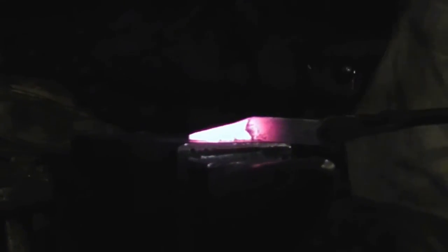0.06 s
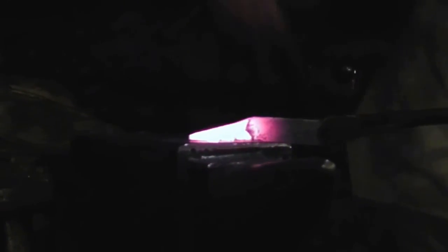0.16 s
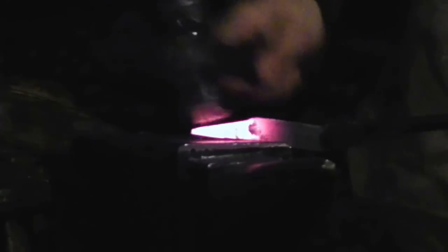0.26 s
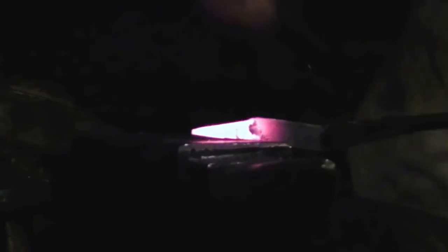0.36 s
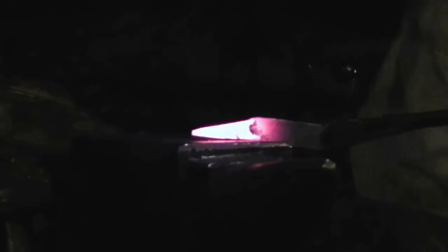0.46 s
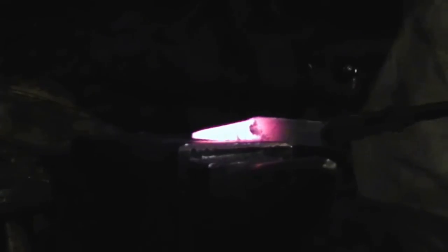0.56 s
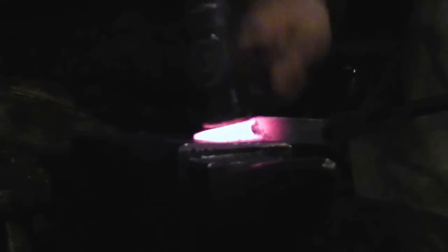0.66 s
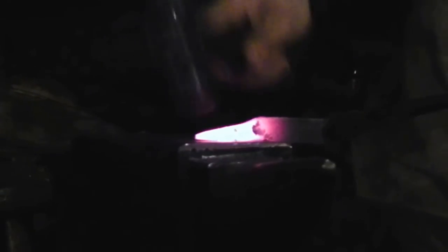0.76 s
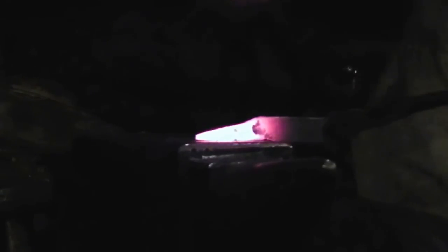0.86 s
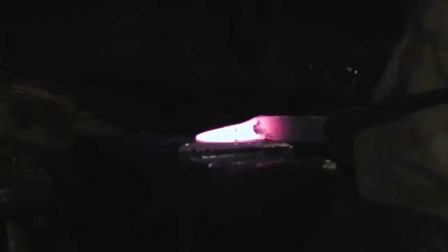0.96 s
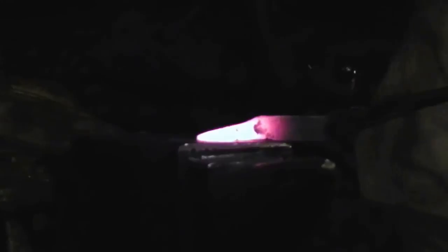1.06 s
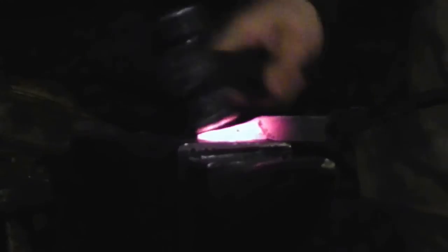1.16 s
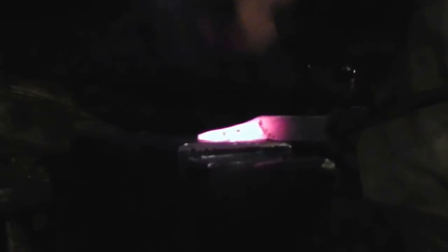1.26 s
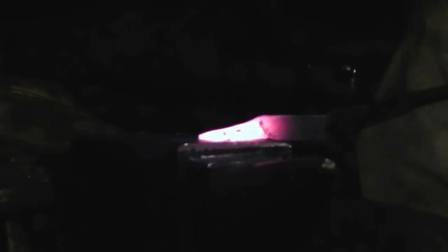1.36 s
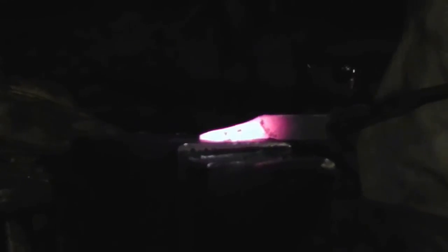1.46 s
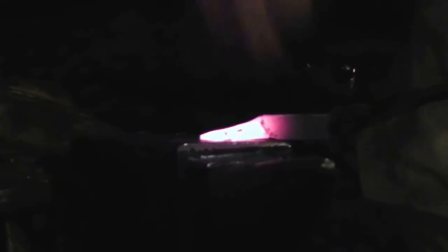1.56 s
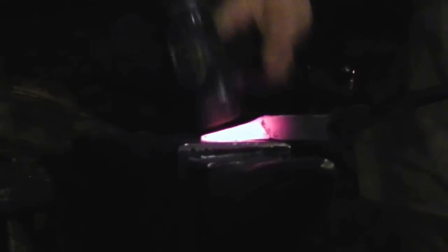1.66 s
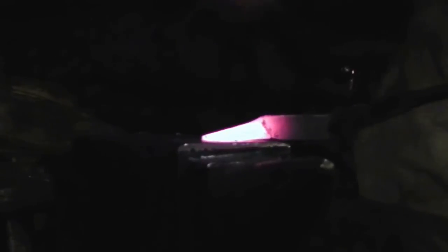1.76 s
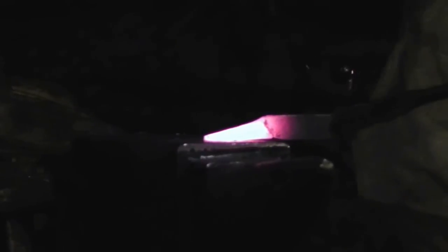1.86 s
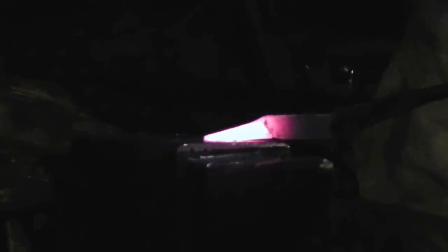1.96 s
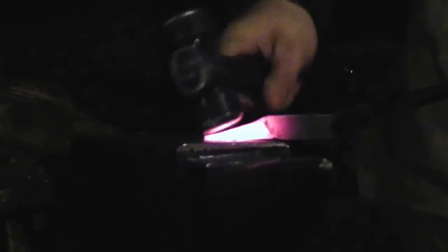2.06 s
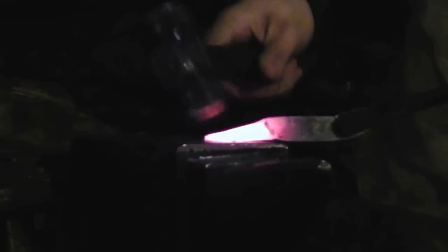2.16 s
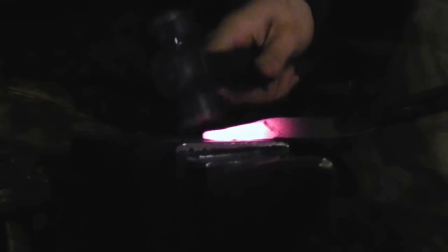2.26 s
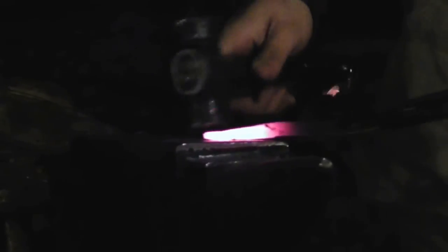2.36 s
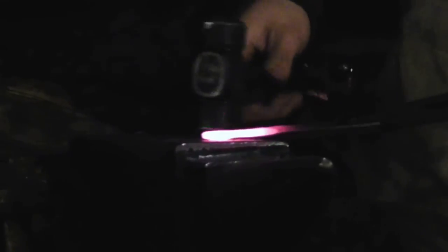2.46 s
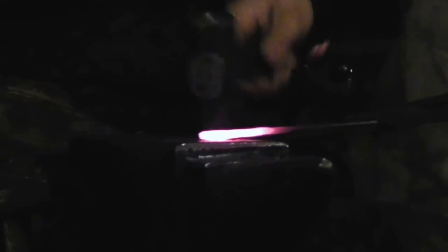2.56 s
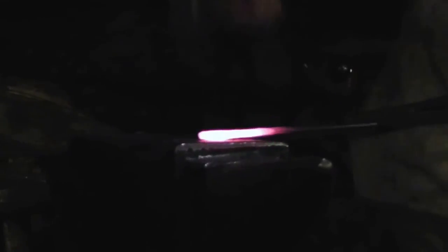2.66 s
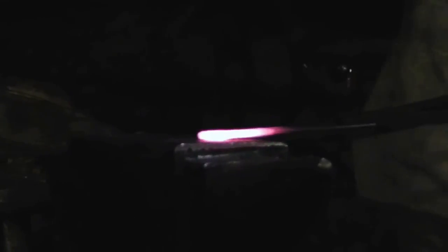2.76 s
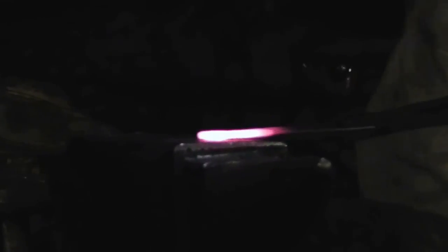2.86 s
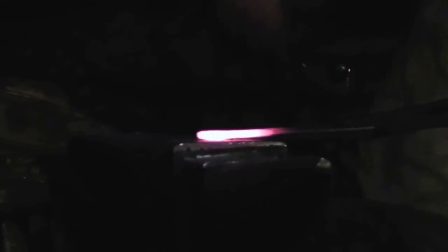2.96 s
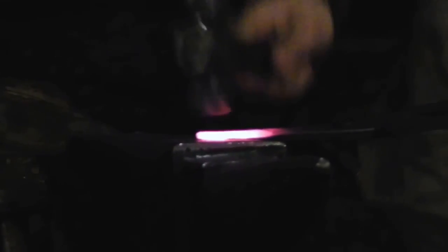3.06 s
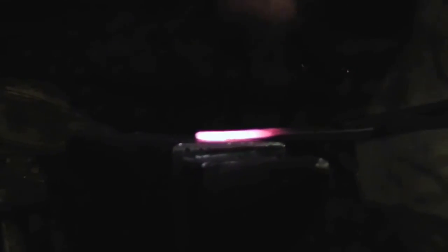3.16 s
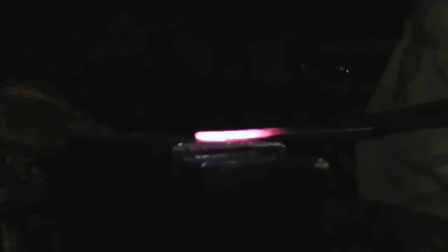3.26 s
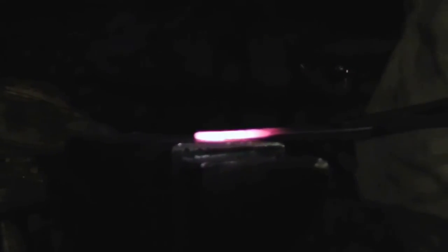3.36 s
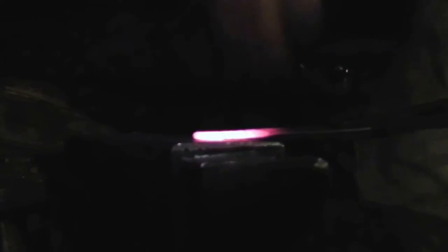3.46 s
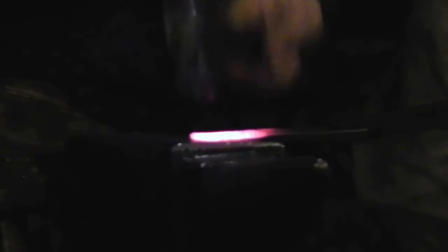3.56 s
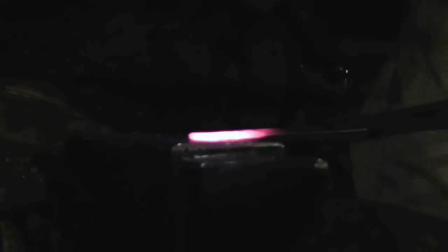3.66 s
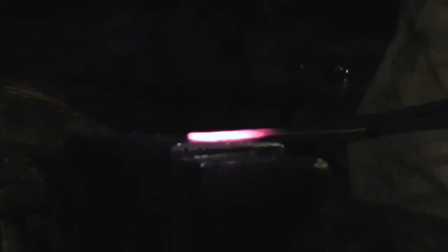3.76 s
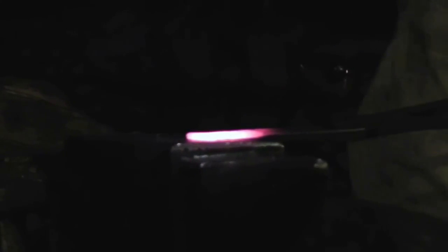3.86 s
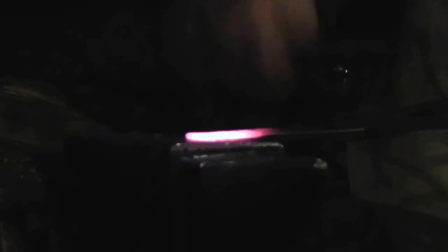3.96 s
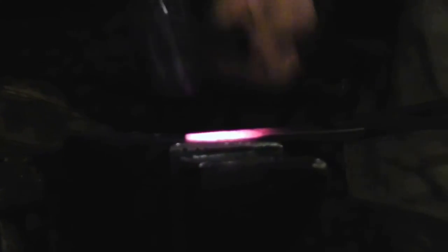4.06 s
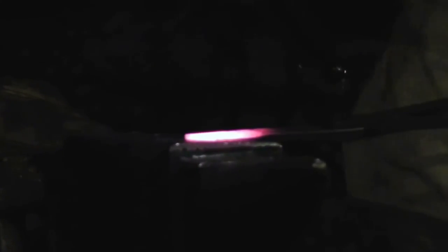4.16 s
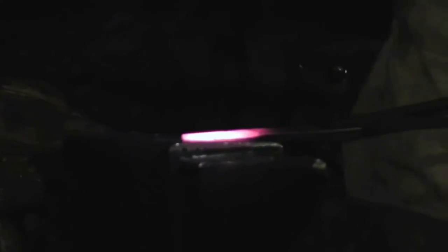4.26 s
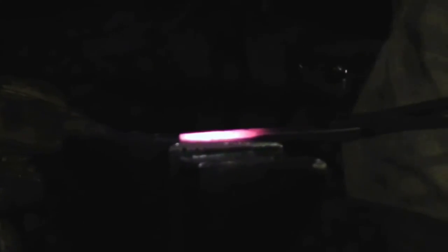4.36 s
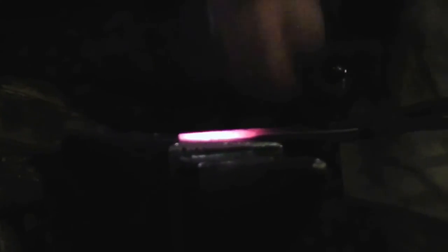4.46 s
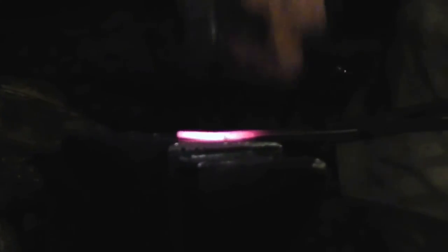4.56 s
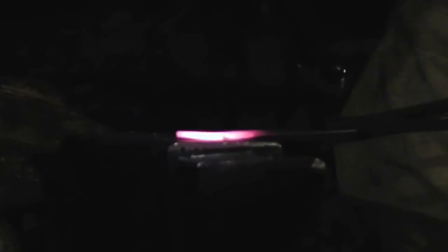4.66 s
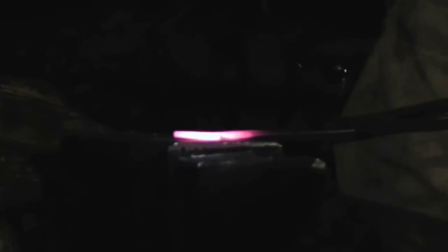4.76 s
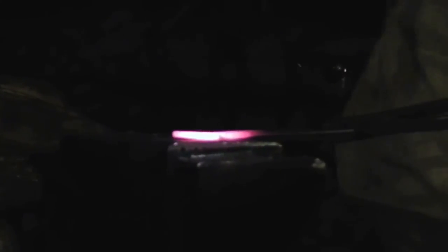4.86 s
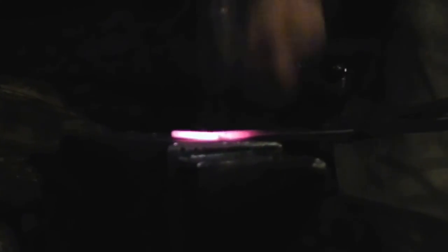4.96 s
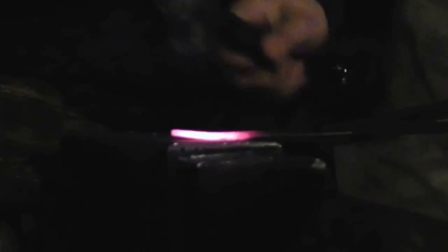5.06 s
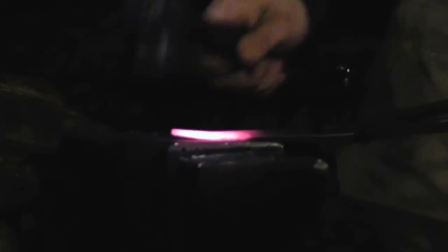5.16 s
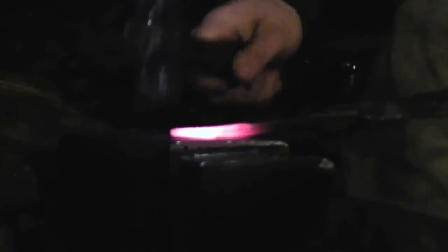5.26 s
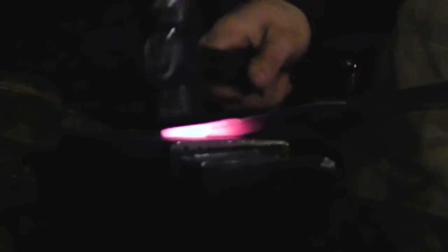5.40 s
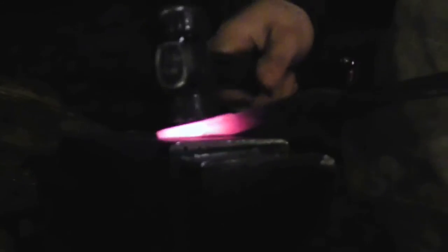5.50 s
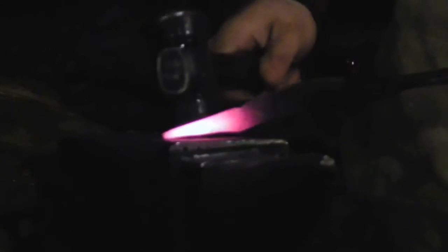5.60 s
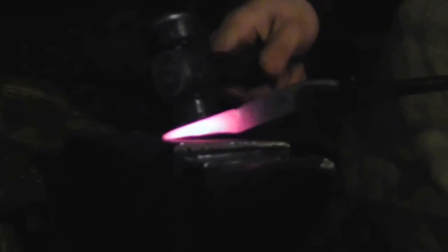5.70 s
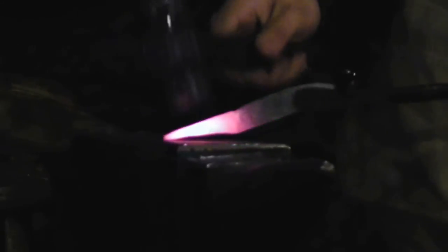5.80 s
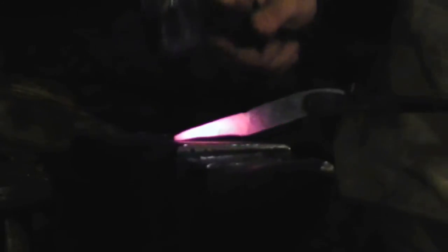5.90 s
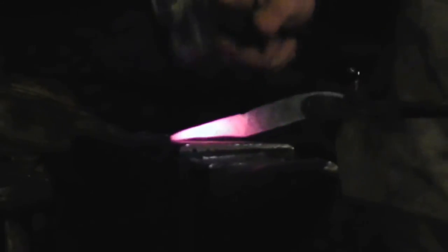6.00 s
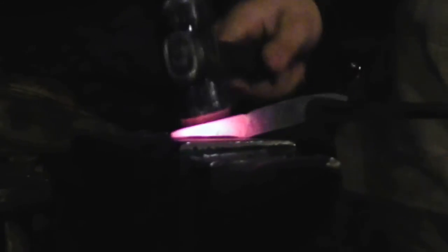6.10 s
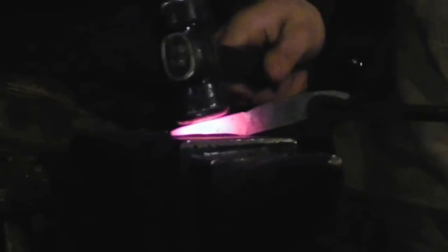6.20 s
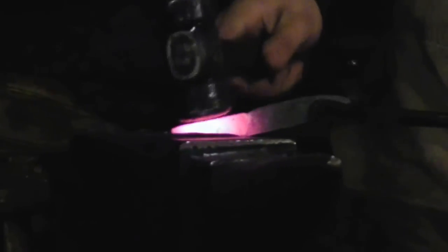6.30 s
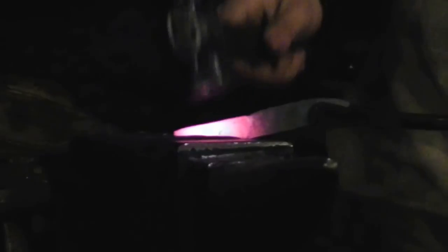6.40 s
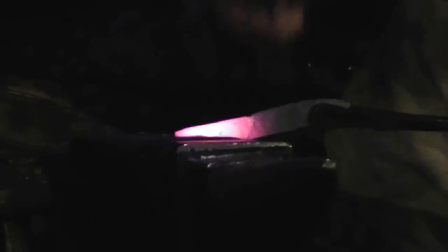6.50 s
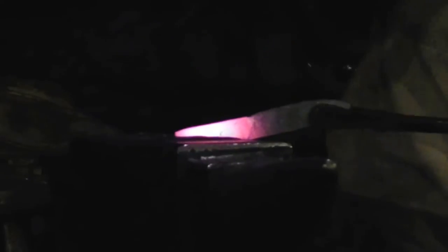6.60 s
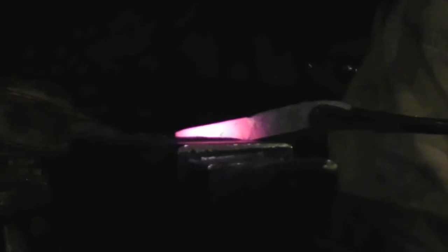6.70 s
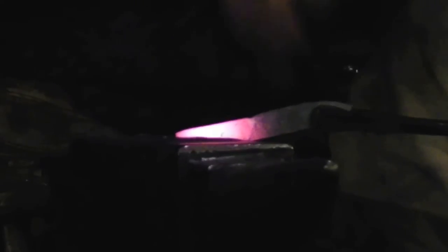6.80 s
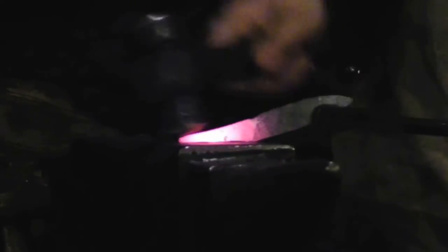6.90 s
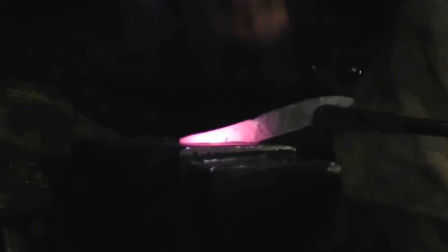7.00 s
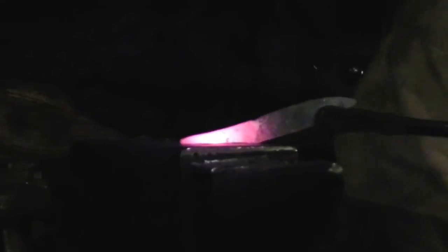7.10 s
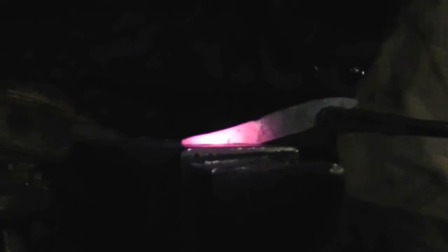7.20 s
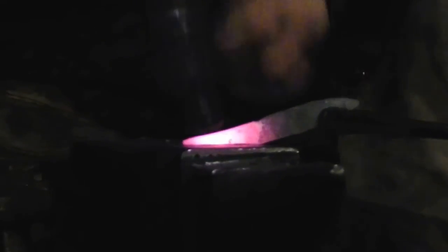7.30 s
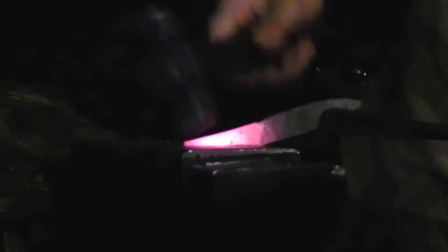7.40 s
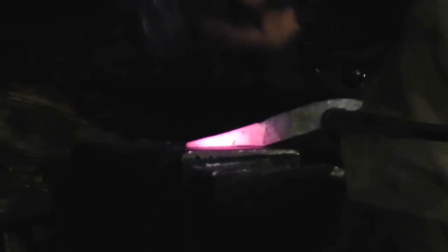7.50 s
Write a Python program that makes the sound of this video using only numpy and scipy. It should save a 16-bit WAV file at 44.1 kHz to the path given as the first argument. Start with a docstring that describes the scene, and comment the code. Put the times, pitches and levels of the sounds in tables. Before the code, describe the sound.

Ten regular hammer blows on a hot bar, growing brighter and harder, with a quick run of light bounces on bare anvil midway and a longer dying patter after the last. Then a pause, soft slaps, a crackier slap, a stronger clank and dull bar knocks. Small, hard-walled forge with short reverberation, a low even rush of air, a close, narrow, dull-topped microphone that clips and squashes the loud hits.

```python
"""A smith works a glowing bar on an anvil in a small forge, at about two hammer blows a second.
Up to 5 s: hard clanks with a short, beating ring; at 2.2 and 5.2 s the hammer bounces on the bare anvil.
From 6 s: slapping blows on a tilted bar, one flatter blow, then dull knocks as the bar shifts.
Each hit is filtered noise plus decaying modes; a faint, even rush of air runs throughout.
Gain control flattens about a tenth of a second of the room's answer; the close microphone overloads."""
import sys
import numpy as np
from scipy import signal
from scipy.io import wavfile

SR = 44100
rng = np.random.default_rng(int(sys.argv[2]) if len(sys.argv) > 2 else 0)


def transcribe(signal):
    """Save signal, clipped to [-1, 1], as a 16-bit WAV file at the path in sys.argv[1]."""
    frames = np.atleast_2d(signal).T
    limited = np.clip(frames, -1, 1)
    pcm = np.round(limited * 32767).astype(np.int16)
    wavfile.write(sys.argv[1], SR, pcm)


N = 332682

# hammer on hot bar: (time [s], force [dB], contact hardness [dB], gap under the bar [0-1])
BLOWS = [ (0.1324, -0.3, -4, .25), (0.5953, -0.5, -0.5, .08), (1.0588, -1.2, -1.5, .06),
         (1.5193, -1.7, 1.5, .0), (1.965, -3, 6, .0), (2.937, -2.3, 0.5, .22), (3.4215, -1, 5, .0),
         (3.9097, -2, -0.5, .0), (4.4121, -4.3, 8, 0.03), (4.904, -4.2, 10, 0), (6.006, -16.7, -7, .85),
         (6.0669, -30, -4, .85), (6.7596, -8.7, -5, .85), (7.2316, -3.7, -4.5, .12)]
# hammer on bare anvil: (time [s], force [dB], contact hardness [dB], face ring [dB])
BOUNCES = [(2.1902, -12.3, 2, -4), (2.285, -16, 5.5, 9.5), (2.3393, -16.8, 1, 7.5),
           (5.153, -12.5, 9.5, 13.5), (5.2960, -15.3, 7, 8), (5.3961, -17, 3, 4.5), (5.4615, -21.5, 2, 5.5),
           (5.5000, -31.5, 1.5, 5)]
# bar shifting on the anvil: (time [s], force [dB])
KNOCKS = [(6.6050, -50), (7.4360, -26.5), (7.4700, -39), (7.4970, -34), (7.5230, -24.5)]

# mode levels are relative; each hit offsets them
# anvil's main note, close modes that beat: (frequency [Hz], level [dB], t60 [s])
ANVIL_NOTE_MODES = [(1790.1, -25.5, .37), (1794.6, -28, .37), (1799, -2.8, .37), (1803.4, -28, .37),
                    (1807.9, -25.5, .37)]
# other modes of the anvil's body: (frequency [Hz], level [dB], t60 [s])
ANVIL_BODY_MODES = [(1033.6, -19.5, 0.35), (1475, -20, 0.1), (1522, -20.5, 0.15), (1942, -18, 0.35),
                    (1979, -15.5, 0.21), (2324, -19, 0.37), (4859, -29, .29), (6640, -19.5, 0.14)]
# stiffer modes of the anvil's face: (frequency [Hz], level [dB], t60 [s])
ANVIL_FACE_MODES = [(3601, -17, .33), (3855, -22, .17), (3876, -18, .17)]
# hammer head: (frequency [Hz], level [dB], t60 [s])
HAMMER_MODES = [(2299, -18.5, .22), (2520, -23, .17), (2573, -25, .18), (3295, -21, .15),
                (3472, -17.5, .27), (4210, -25, .12), (5330, -24, .16), (5405, -25, .2), (6230, -22, .15),
                (7110, -21, .1)]
# dull knock of the anvil on its stand: (frequency [Hz], level [dB], t60 [s])
STAND_MODES = [(241, -30, 0.54), (304.7, -24.5, 0.27), (346.4, -28.5, 0.51), (401, -29.5, 0.35),
               (502.6, -32, 0.28), (587, -26, 0.47), (696, -25, 0.3), (780, -26, 0.099), (877, -25, 0.29)]

# spectra are relative; in_bands() normalises their power
# first burst, straight from the contact: (frequency [Hz], density [dB per Hz])
BURST_SPECTRUM = [(35, -25.5), (150, -11), (400, 0.5), (800, 0.5), (1500, -1.5), (3000, -6), (3700, 6.5),
                  (4800, -1.5), (7000, 1)]
# broad impact as the room returns it: (frequency [Hz], density [dB per Hz])
CLANK_SPECTRUM = [(35, -29), (75, -25), (115, -14.5), (175, -2.5), (260, 6), (450, 3.5), (750, 3.5),
                  (1400, 1), (2400, -2.5), (2900, -3), (3600, -1), (4600, -5.5), (7000, -10)]
# decay of the forge: (frequency [Hz], t60 [s])
FORGE_T60 = [(50, 0.38), (150, 0.71), (300, 0.37), (700, 0.36), (2000, 0.37), (4000, 0.29), (7500, 0.28)]
# rush of air: (frequency [Hz], density [dB per Hz])
AIR_SPECTRUM = [(30, -27.5), (60, -4), (130, -1), (260, 1.5), (450, -2.5), (900, -3.5), (1900, -7.5),
                (3000, -12), (5000, -14.5), (7500, -16.5)]
# level of the rush: (time [s], level [dB])
AIR_LEVEL = [(0, -57.1), (5.9, -57.1), (6.45, -59.9), (7.54, -57.2)]
# centres of the thud, force, clang and crack ranges: (frequency [Hz])
RANGES_HZ = [260, 900, 3200, 6800]

BAND_EDGES_HZ = np.geomspace(25, 9500, 25)
BAND_HZ = np.sqrt(BAND_EDGES_HZ[1:] * BAND_EDGES_HZ[:-1])
BANK = [signal.butter(2, BAND_EDGES_HZ[k:k + 2], "band", fs=SR, output="sos") for k in range(len(BAND_HZ))]
AGE_S = np.arange(SR) / SR  # time since a hit

# flat bar: the soft steel damps the hammer
BAR_THUD_DB, BAR_CRACK_DB, BAR_BODY_DB, BAR_FACE_DB, BAR_HEAD_DB = -0.6, -0.7, -0.5, -10, -16
# tilted bar: change at full gap
GAP_THUD_DB, GAP_CRACK_DB, GAP_BODY_DB = 6, 12, -16
# steel on steel: the hammer rings freely
BOUNCE_THUD_DB, BOUNCE_CRACK_DB, BOUNCE_BODY_DB, BOUNCE_HEAD_DB = 3, -13.5, -4.5, 2
# dB per dB of hardness
CRACK_PER_HARDNESS, BOUNCE_CRACK_PER_HARDNESS = .55, 2.3
FACE_PER_HARDNESS, HEAD_PER_HARDNESS = 1.2, .6

WALL_ECHO_S, WALL_ECHO_DB = .03807, -9.4
FAR_ECHO_S, FAR_ECHO_DB = .16982, -25
BOOM_HZ, BOOM_AT_S, BOOM_WIDTH_S, BOOM_DB = (200, 320), .09, .018, -11
MIC_TOP_HZ, TREBLE_SPLIT_HZ, CUTOFF_HZ = 7328, 8200, 16500


def hammering():
    """Blows, bounces and knocks, each at its time and force, all in the same room."""
    out = np.zeros(N + 2 * SR)
    bands = clank_bands()
    for rows, sound in ((BLOWS, blow), (BOUNCES, bounce), (KNOCKS, knock)):
        for time_s, force_db, *manner in rows:
            start = round(time_s * SR)
            out[start:start + SR] += from_db(force_db) * sound(bands, *manner)
    return out[:N]


def blow(bands, hardness_db, gap):
    """Hammer on hot bar: hardness brightens it; a gap trades the anvil's ring for slap and crack."""
    return strike(bands,
                  thud_db=BAR_THUD_DB + GAP_THUD_DB * gap,
                  clang_db=hardness_db,
                  crack_db=BAR_CRACK_DB + CRACK_PER_HARDNESS * hardness_db + GAP_CRACK_DB * gap,
                  body_db=BAR_BODY_DB + GAP_BODY_DB * gap,
                  face_db=BAR_FACE_DB + FACE_PER_HARDNESS * hardness_db,
                  head_db=BAR_HEAD_DB + HEAD_PER_HARDNESS * hardness_db)


def bounce(bands, hardness_db, face_db):
    """Hammer on bare anvil: a light tap that rings the face more or less with the spot."""
    return strike(bands,
                  thud_db=BOUNCE_THUD_DB,
                  clang_db=hardness_db,
                  crack_db=BOUNCE_CRACK_DB + BOUNCE_CRACK_PER_HARDNESS * hardness_db,
                  body_db=BOUNCE_BODY_DB,
                  face_db=face_db,
                  head_db=BOUNCE_HEAD_DB + HEAD_PER_HARDNESS * hardness_db,
                  stand_db=-1.0)


def knock(bands):
    """The soft bar touches the anvil with hardly any ring."""
    return strike(bands, thud_db=2.5, clang_db=-10.5, crack_db=-25, body_db=-17, face_db=-9, head_db=-18)


def strike(bands, thud_db, clang_db, crack_db, body_db, face_db, head_db, stand_db=0.0):
    """Any contact: a clank in its own colour, with anvil, stand and hammer set ringing."""
    range_db = [thud_db, 0, clang_db, crack_db]
    colour = from_db(np.interp(np.log(BAND_HZ), np.log(RANGES_HZ), range_db))
    clank = signal.fftconvolve(colour @ bands, contact())[:SR]
    clank += from_db(thud_db) * boom()
    note = from_db(body_db) * ring(ANVIL_NOTE_MODES)
    steel = note + from_db(body_db) * ring(ANVIL_BODY_MODES)
    steel += from_db(face_db) * ring(ANVIL_FACE_MODES)
    steel += from_db(head_db) * ring(HAMMER_MODES)
    steel += from_db(thud_db + stand_db) * ring(STAND_MODES)
    return clank + with_wall_echo(steel) + far_echo(with_wall_echo(note))


def contact(crunch_db=-7.0, crunch_t60_s=0.003, crunch_hz=2200):
    """One push, then a few milliseconds of scale crushing and the bar slapping the anvil."""
    crunch = (rng.standard_normal(SR) * dying(crunch_t60_s))[:SR // 50]
    crunch /= np.linalg.norm(crunch)
    pulse = from_db(crunch_db) * butter(crunch, crunch_hz, "high")
    pulse[0] += 1
    return pulse


def ring(modes, scatter_db=0.45):
    """Decaying sine modes, each randomly stronger or weaker with the spot that is hit."""
    total = np.zeros(SR)
    for hz, level_db, t60_s in modes:
        gain = from_db(level_db + scatter_db * rng.standard_normal())
        total += gain * np.sin(2 * np.pi * hz * AGE_S) * dying(t60_s)
    return total


def clank_bands(burst_db=1.0, slap_db=-5.0, slap_s=.0055,
                early_db=-5.0, early_t60_s=0.061, room_db=-7.5, build_s=0.006):
    """Path from anvil to microphone, shared by all hits: hard burst, near reflection, room."""
    push = np.exp(-(AGE_S / .003) ** 4)
    burst = from_db(burst_db) * (push + from_db(slap_db) * delayed(push, slap_s))
    tails = np.array([dying(t60_s) for t60_s in at_hz(FORGE_T60, BAND_HZ)])
    early = from_db(early_db) * dying(early_t60_s)
    late = from_db(room_db) * tails * (1 - np.exp(-AGE_S / build_s))
    direct = in_bands(rng.standard_normal((2, SR)) * burst, BURST_SPECTRUM)
    return direct + in_bands(rng.standard_normal((2, SR)), CLANK_SPECTRUM) * (early + late)


def boom():
    """Low notes of the room gather into a brief swell about a tenth of a second after the hit."""
    swell = np.exp(-.5 * ((AGE_S - BOOM_AT_S) / BOOM_WIDTH_S) ** 2)
    return from_db(BOOM_DB) * swell * butter(rng.standard_normal(SR), BOOM_HZ, "band")


def with_wall_echo(ringing):
    """The near wall returns the ring out of step with the main note and chokes it."""
    return ringing + from_db(WALL_ECHO_DB) * delayed(ringing, WALL_ECHO_S)


def far_echo(ringing):
    """The far end of the forge returns the main note late and soft-edged: it dips and swells again."""
    soft_edged = ringing * (1 - dying(.06))
    return from_db(FAR_ECHO_DB) * delayed(soft_edged, FAR_ECHO_S)


def air():
    """Faint, even rush of air behind the work: noise shaped in bands."""
    # the first second is dropped: filters settle
    rush = in_bands(rng.standard_normal((2, N + SR)), AIR_SPECTRUM).sum(axis=0)[SR:]
    level_db = np.interp(np.arange(N) / SR, *np.transpose(AIR_LEVEL))
    return from_db(level_db) * rush


def in_bands(white, spectrum):
    """Two white noises, dealt in turn to the bands; the rows sum to the spectrum at unchanged power."""
    gain = from_db(at_hz(spectrum, BAND_HZ))
    gain = gain / np.sqrt(np.sum(gain ** 2 * np.diff(BAND_EDGES_HZ)) / (SR / 2))
    rows = [g * signal.sosfilt(sos, white[k % 2]) for k, (g, sos) in enumerate(zip(gain, BANK))]
    return np.array(rows)


def from_db(db):
    """Decibels to amplitude gain."""
    return 10 ** (np.asarray(db) / 20)


def at_hz(points, hz):
    """Read a table along a logarithmic frequency axis."""
    f, value = np.transpose(points)
    return np.interp(np.log(hz), np.log(f), value)


def dying(t60_s):
    """One second of exponential decay, down 60 dB after t60_s."""
    return np.exp(-np.log(1000) * AGE_S / t60_s)


def delayed(x, seconds):
    """The same sound, arriving later."""
    return np.interp(AGE_S - seconds, AGE_S, x, left=0)


def butter(x, hz, kind, order=2):
    """Causal Butterworth filter."""
    return signal.sosfilt(signal.butter(order, hz, kind, fs=SR, output="sos"), x)


def scene():
    """Hammer and anvil over the quiet of the forge."""
    return (hammering() + air())[None]


def smooth(x, seconds):
    """One-pole follower."""
    r = np.exp(-1 / (seconds * SR))
    return signal.lfilter([1 - r], [1, -r], x)


def gain_control(x, threshold_db=-13.0, release_db_per_s=130.0, sense_s=.002, attack_s=.004):
    """Turns down too late for the impact, then comes back up while the room dies away."""
    power_db = 10 * np.log10(smooth(x ** 2, sense_s) + 1e-12)
    over_db = np.maximum(power_db - threshold_db, 0)
    # running maximum on a ramp = peak hold with linear release
    ramp_db = release_db_per_s * np.arange(N) / SR
    held_db = np.maximum.accumulate(over_db + ramp_db, axis=-1) - ramp_db
    return x * from_db(-smooth(held_db, attack_s))


def record(dry, ceiling=0.57, low_cut_hz=72, treble_db=-17.0):
    """Narrow-band microphone, gain control, hard clipping, dull treble, both ends cut."""
    mic = signal.ellip(8, .5, 80, MIC_TOP_HZ, fs=SR, output="sos")
    heard = signal.sosfilt(mic, dry)
    clipped = np.clip(gain_control(heard), -ceiling, ceiling)
    clipped = butter(clipped, low_cut_hz, "high", order=1)
    below = butter(clipped, TREBLE_SPLIT_HZ, "low", order=8)
    above = butter(clipped, TREBLE_SPLIT_HZ, "high", order=8)
    top_cut = signal.ellip(10, .1, 80, CUTOFF_HZ, fs=SR, output="sos")
    return signal.sosfilt(top_cut, below + from_db(treble_db) * above)


dry = scene()
out = record(dry)
transcribe(out)
```